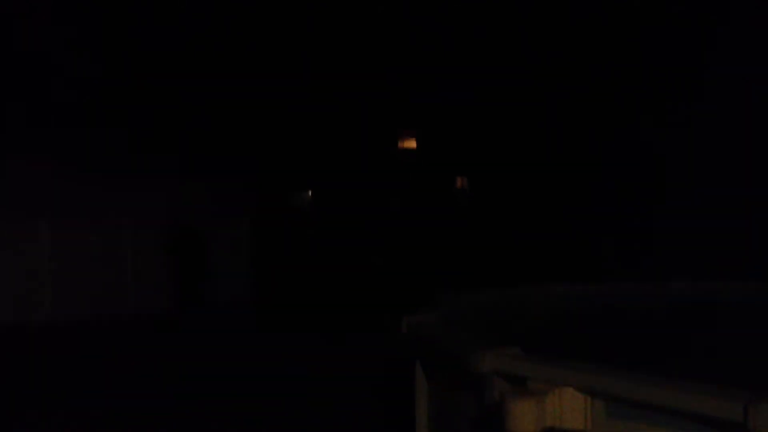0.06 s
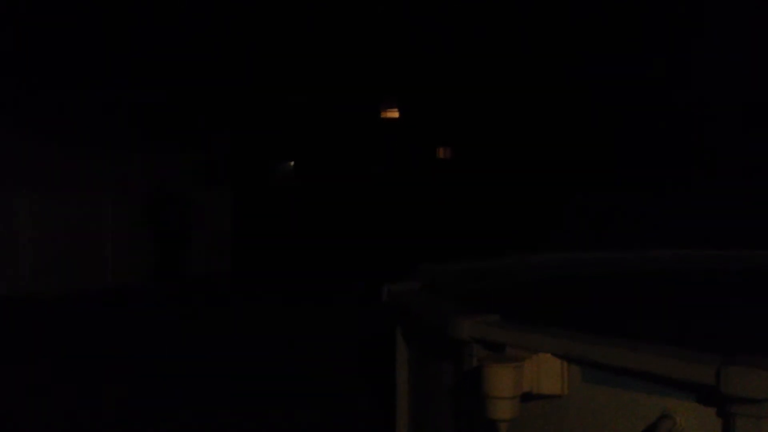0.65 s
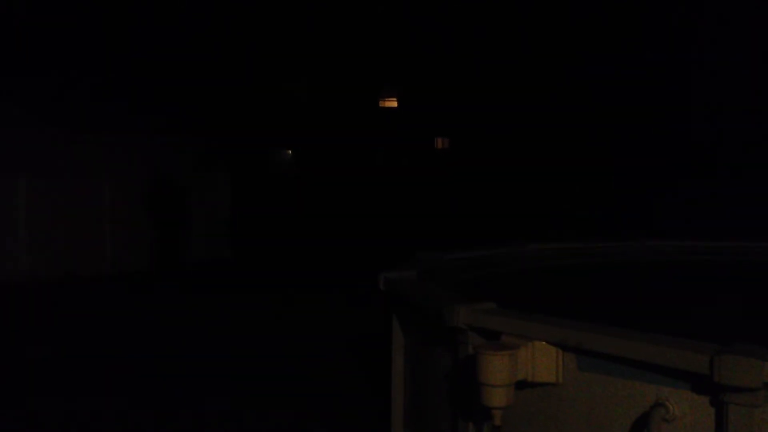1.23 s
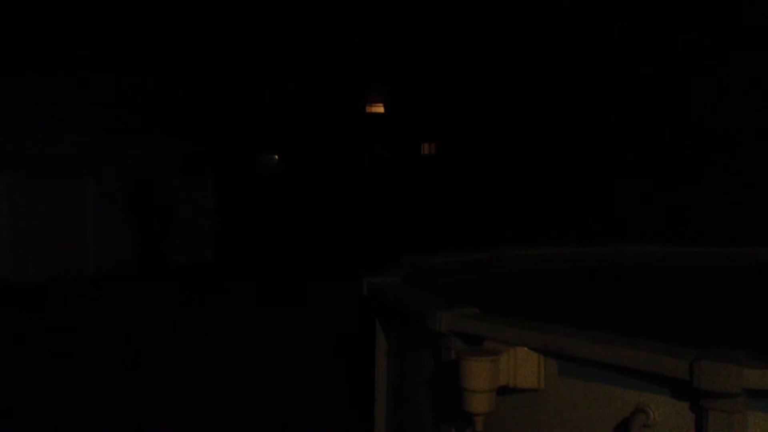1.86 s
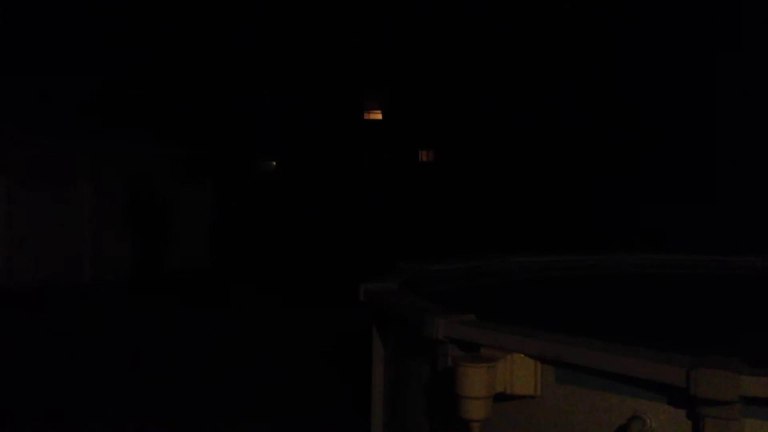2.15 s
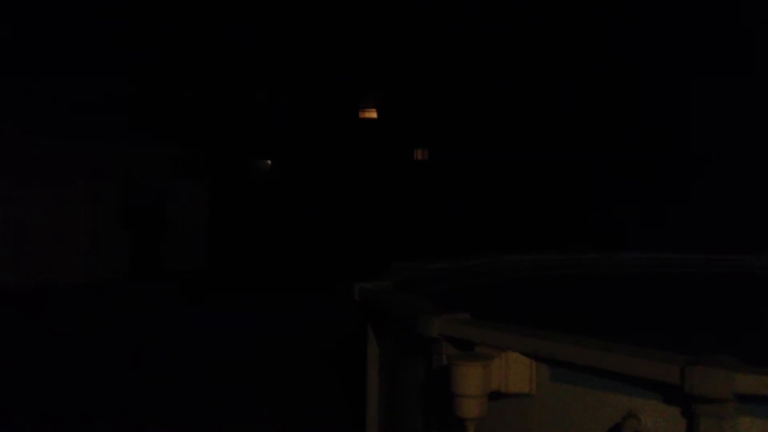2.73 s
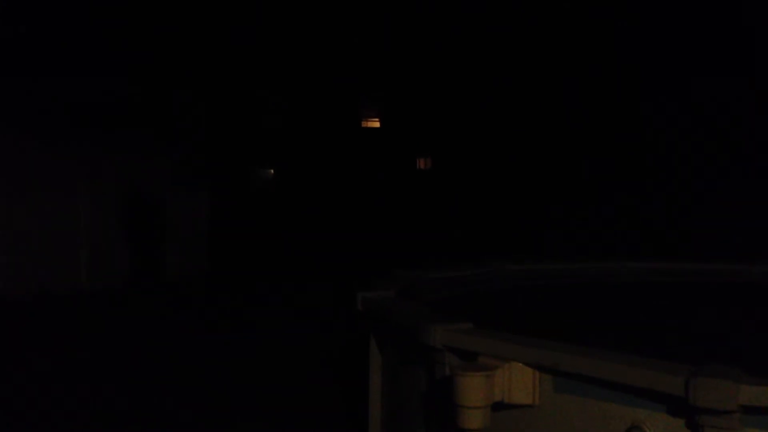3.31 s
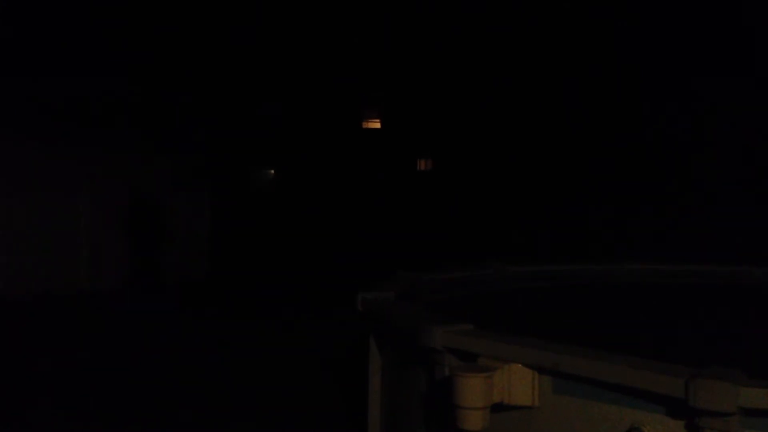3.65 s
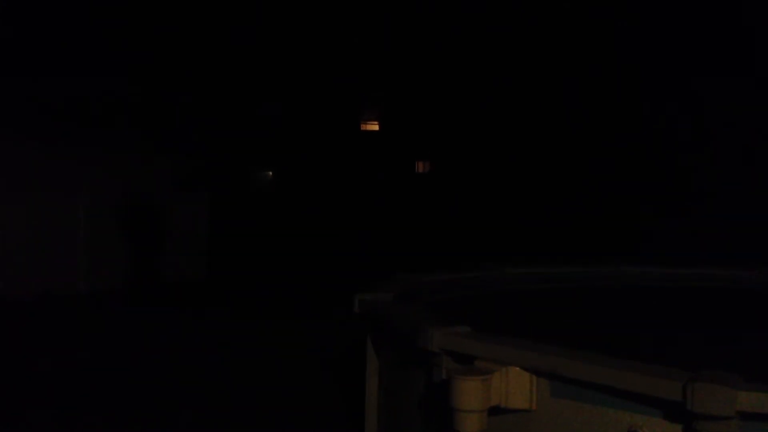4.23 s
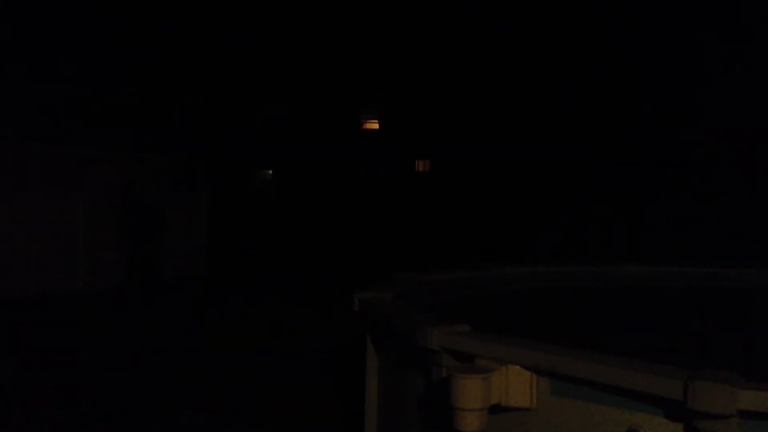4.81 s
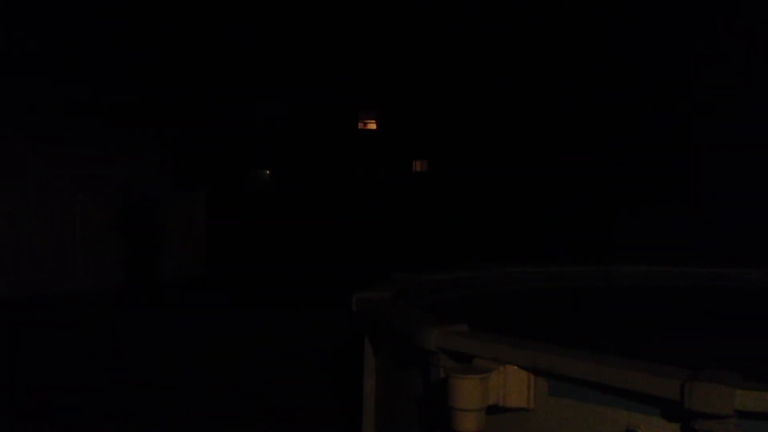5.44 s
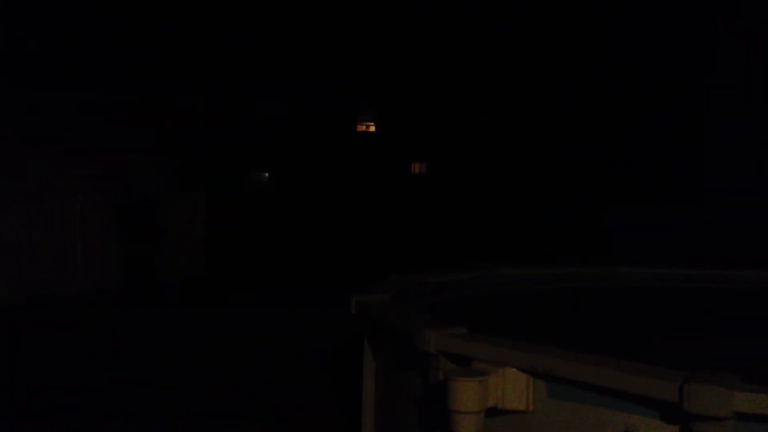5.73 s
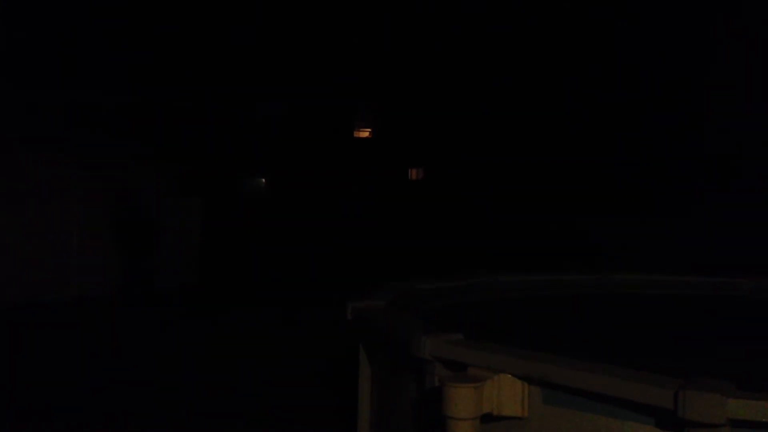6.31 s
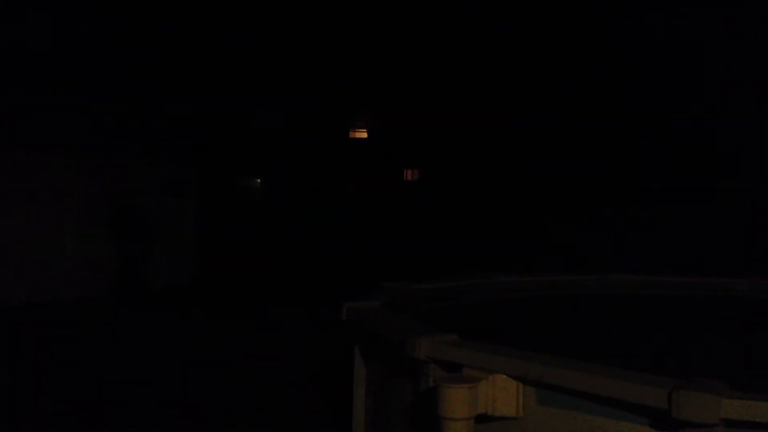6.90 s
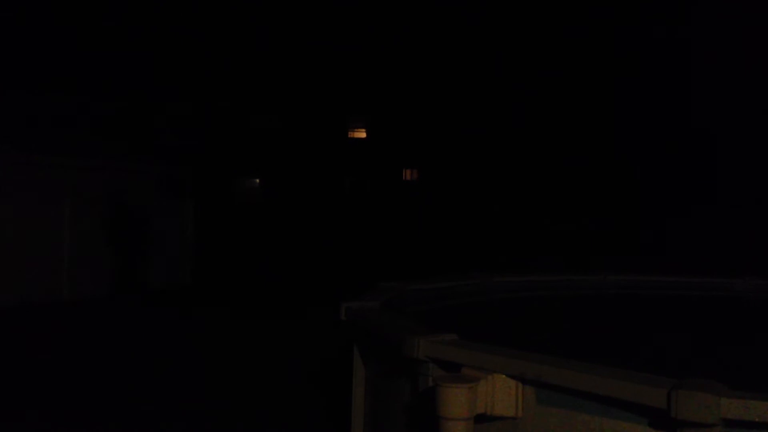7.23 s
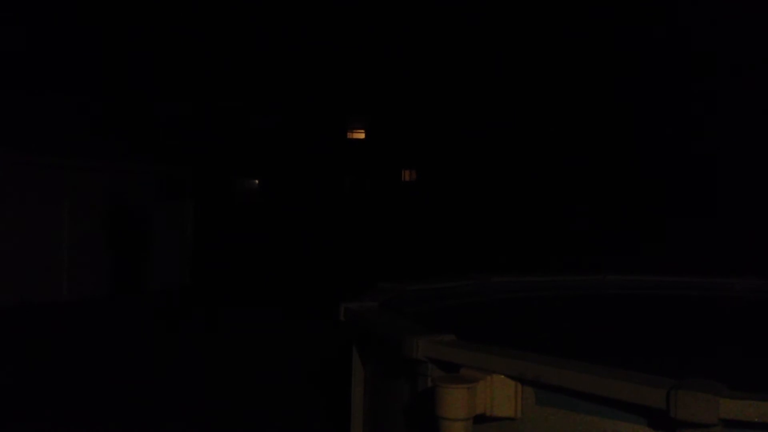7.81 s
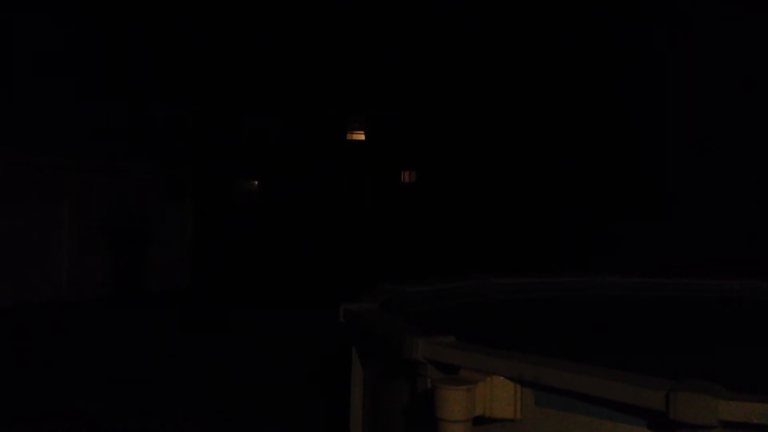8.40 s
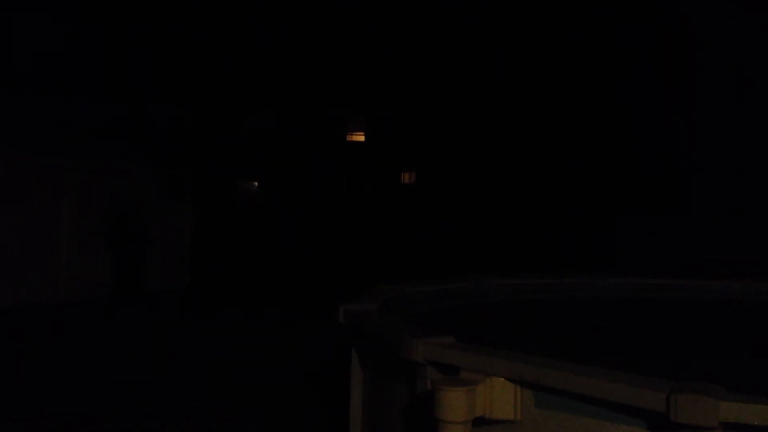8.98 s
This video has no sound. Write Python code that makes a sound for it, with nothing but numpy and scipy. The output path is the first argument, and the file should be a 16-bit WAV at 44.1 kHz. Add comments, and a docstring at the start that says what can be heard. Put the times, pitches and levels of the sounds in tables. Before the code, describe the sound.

Three treefrogs trade short, raspy, pulsing trills in a backyard at night, over a faint steady neighbourhood rumble and fine hiss. Each call leaves a brief echo. The nearest, loudest frog trills from about 0.5 to 1 second. A faint, faster one answers at 1.6 seconds, and a slightly higher frog at medium distance calls at 2.9. The near frog returns from 3.5 to 4.1 seconds, then overlaps with the higher one between 5.2 and 5.8. The faint frog calls again at 6.9 seconds, the higher one at 7.7, and the faint one once more at about 8.8. Far in the background, a car engine hums low and quietly from about 3 to 6 seconds. Its tyre noise swells softly to a peak around 7.4 seconds and then eases off, staying well below the closer frogs.

```python
"""A backyard at night, where three treefrogs trill in turn from the trees.
Each pulse of a trill is a short upward chirp of the larynx whose octave resonates in the vocal sac.
Hard surfaces return discrete echoes, and scattering in the yard adds a reverberant tail.
A distant car hums, then its tyres swell and fade, over the neighbourhood's rumble and a fine hiss."""
import sys
import numpy as np
from scipy import signal
from scipy.fft import rfft, irfft, next_fast_len
from scipy.io import wavfile
from scipy.ndimage import uniform_filter1d

SR = 44100
rng = np.random.default_rng(int(sys.argv[2]) if len(sys.argv) > 2 else 0)


def output_pcm(signal):
    """Save a mono or channel-first signal as 16-bit PCM at the path in sys.argv[1].

    Samples are clipped to [-1, 1] before scaling.
    """
    pcm = np.clip(np.atleast_2d(signal).T, -1, 1) * 32767
    wavfile.write(sys.argv[1], SR, np.round(pcm).astype(np.int16))


N = 403515

# throat resonances of the high and fast frogs (frequency [Hz], gain [dB])
SHARED_THROAT = [(2300, -23), (2750, -5), (3100, -3), (3500, 0.5), (3900, -18), (4600, -17), (5300, -31),
                 (6500, -20), (7100, -21), (7700, -14.5), (8500, -32)]
# their rasp spectrum (frequency [Hz], relative level [dB])
SHARED_RASP = [(300, -27), (1400, 1), (2600, -1), (3400, 5), (4000, -7), (5200, -11), (6600, -7),
               (7150, -8), (7700, -0.5), (8400, -16), (12000, -23)]


def undb(db):
    """Decibels to amplitude ratio."""
    return 10 ** (np.asarray(db) / 20)


def unit(x):
    """Normalisation to rms 1."""
    return x / np.sqrt(np.mean(x ** 2))


def curves(table, at):
    """Linear interpolation of each column against the first."""
    first, *columns = np.transpose(table)
    return [np.interp(at, first, c) for c in columns]


def colour(x, points):
    """Minimum-phase filter through points (frequency [Hz], gain [dB])."""
    size = next_fast_len(len(x) + 8192, True) // 2 * 2
    hz, db = np.transpose(points)
    bin_hz = np.arange(size // 2 + 1) * SR / size
    gain_db = np.interp(np.log(bin_hz + 1), np.log(hz), db)
    cepstrum = irfft(np.log(undb(gain_db)))
    cepstrum[1:size // 2] *= 2  # folding makes the response causal
    cepstrum[size // 2 + 1:] = 0
    return irfft(rfft(x, size) * np.exp(rfft(cepstrum)))[:len(x)]


def wander(rate):
    """Low-pass random modulation of rms 1."""
    hold = max(int(SR / rate), 1)
    steps = np.repeat(rng.standard_normal(N // hold + 1), hold)
    return unit(uniform_filter1d(uniform_filter1d(steps, hold), hold)[:N])


def night():
    """Stationary noise: town rumble and microphone hiss."""
    # noise floor (frequency [Hz], relative density [dB])
    spectrum = [(15, -67), (25, -36), (75, -23.5), (93, -10), (186, -1.5), (224, -10.5), (326, -4),
                (373, -11.5), (462, -10), (1120, -15.5), (1460, -17), (1910, -18), (2700, -20.5),
                (3180, -19), (15000, -24)]
    return unit(colour(rng.standard_normal(N), spectrum)) * undb(-64.5)


def car():
    """An exhaust tone at the firing rate drops out as the throttle closes; rolling noise peaks later."""
    # exhaust note (time [s], firing rate [Hz], level [dB])
    engine = [(2.7, 160.6, -76), (2.83, 161.0, -78), (2.95, 150.0, -68.5), (3.48, 151.3, -67),
              (3.91, 152.8, -61), (3.95, 153.4, -67.5), (4.32, 155.4, -65), (4.35, 156.3, -77),
              (4.45, 155.7, -62), (4.63, 155.3, -66.5), (5.2, 157.9, -59), (5.31, 158.5, -66.5),
              (5.88, 156.4, -60.5), (5.93, 152.8, -88)]
    # tyre swell (time [s], level [dB])
    tyre_levels = [(0, -73.5), (2.5, -68.5), (4, -65.5), (4.8, -63), (6.3, -59.5), (6.8, -58), (7.4, -55),
                   (8, -57.5), (8.6, -59.5), (9.15, -59)]
    # tyre spectrum (frequency [Hz], relative level [dB])
    tyre_colour = [(40, -33), (90, -13), (130, -3.5), (180, 5), (250, 2.5), (400, -6), (700, -6),
                   (1100, -3), (1700, -3.5), (2500, -7), (3500, -16.5), (5000, -24), (9000, -49)]
    t = np.arange(N) / SR
    hz, db = curves(engine, t)
    phase = 2 * np.pi * np.cumsum(hz * (1 + 0.0031 * wander(9.7))) / SR
    hum = np.sqrt(2) * np.sin(phase) * undb(db + 1.1 * wander(9))
    tyre_db, = curves(tyre_levels, t)
    tyres = unit(colour(rng.standard_normal(N), tyre_colour))
    return hum + tyres * undb(tyre_db + .5 * wander(6))


def yard(x, echoes, tail_db, t60, build_s):
    """Reverberation: direct sound, hard reflections and a decaying tail scattered by leaves and houses."""
    # filters of the reflections and of the diffuse tail (frequency [Hz], gain [dB])
    echo_colour = [(500, -13.5), (1100, -10), (1600, -11), (2000, -1), (2350, -5), (3100, -5), (7000, -7.5)]
    tail_colour = [(500, -6.5), (1050, -7.5), (1600, -9), (2150, 0.5), (2450, 2), (3100, -2.5),
                   (7000, -9.5)]
    t = np.arange(SR) / SR
    taps = np.zeros(SR)
    for ms, db in echoes:
        taps[int(ms * SR / 1000)] += undb(db)
    tail = rng.standard_normal(SR) * undb(-60 * t / t60) * (1 - np.exp(-t / build_s))
    tail *= undb(tail_db) / np.linalg.norm(tail)
    response = colour(taps, echo_colour) + colour(tail, tail_colour)
    return x + signal.fftconvolve(x, response)[:N]


def trills(table, per_s, slowing, warmup_s, soft_db, sac_soft_db, flat):
    """Pulse trains start soft and flat; the slack relaxes exponentially as the sac inflates."""
    scatter_db, scatter_pitch = 1.3, 0.012
    pulses = []
    for first, last, db, sac_db, hz in table:
        progress = np.linspace(0, 1, int(round((last - first) * per_s)) + 1)
        elapsed = (last - first) * (progress - slowing * progress * (1 - progress))
        slack = np.exp(-elapsed / warmup_s)
        chance = rng.standard_normal((len(progress), 3)).T
        pulses += zip(first + elapsed,
                      db + soft_db * slack + scatter_db * chance[0],
                      sac_db + sac_soft_db * slack + scatter_db * chance[1],
                      hz * (1 - flat * slack + scatter_pitch * chance[2]), slack)
    return pulses


def frog_voice(pulses, shape, throat, rasp_colour, overtone_db, rasp_db, jitter):
    """Source and filter: each push of the flanks sweeps the larynx upward; the sac favours the octave."""
    slack_db_per_ms = 0.3  # a weak push sounds only around its peak
    ms = np.arange(int(shape[0][0] * SR / 1000), int(shape[-1][0] * SR / 1000)) * 1000 / SR
    bend, fundamental_db, octave_db, edge_db = curves(shape, ms)
    waver = 1 + jitter * wander(900)
    tone, overtones, rasp_envelope = np.zeros((3, N))
    for onset, db, sac_db, hz, slack in pulses:
        at = int(onset * SR + ms[0] * SR / 1000) + np.arange(len(ms))
        inside = (at >= 0) & (at < N)
        at = at[inside]
        pitch = hz * (1 + bend[inside] / 100) * waver[at]
        phase = 2 * np.pi * np.cumsum(pitch) / SR + rng.uniform(0, 2 * np.pi)
        taper_db = -slack_db_per_ms * slack * np.abs(ms[inside])
        fundamental = undb(db + fundamental_db[inside] + taper_db)
        octave = undb(sac_db + octave_db[inside] + taper_db)
        tone[at] += fundamental * np.cos(phase) - octave * np.cos(2 * phase)
        # harder pushes give stronger overtones
        overtones[at] += np.sqrt(fundamental * octave) * sum(np.cos(k * phase) for k in range(3, 8))
        rasp_envelope[at] += undb((db + sac_db) / 2 + edge_db[inside] + taper_db)
    rasp = rasp_envelope * unit(colour(rng.standard_normal(N), rasp_colour))
    return tone + undb(overtone_db) * colour(overtones, throat) + undb(rasp_db) * rasp


def fast_frog():
    """A faint, rapid pulse train with a low direct-to-reverberant ratio."""
    # trills (start [s], end [s], fundamental [dB], octave [dB], pitch [Hz])
    calls = [(-0.25, 0.05, -71, -58, 1108), (1.599, 1.946, -54, -43.5, 1123),
             (6.893, 7.236, -55.5, -44, 1107), (8.829, 9.165, -55, -44, 1101)]
    # one pulse (time from peak [ms], bend [%], fundamental [dB], octave [dB], rasp [dB])
    shape = [(-13.5, -20, -25, -26, -27), (-7.5, -12.5, 0, -13, -4), (-2.5, 0.5, -3, -3, -7),
             (0, -0.5, -5.5, 0, 3), (3.5, 3, 7, -4, -2), (11.5, 9, -12, -39, -22)]
    # reflections (delay [ms], gain [dB])
    echoes = [(10, -13), (21, 1), (47, -7.5), (76, 0)]
    pulses = trills(calls, per_s=29.3, slowing=0, warmup_s=0.032, soft_db=-10, sac_soft_db=-13, flat=0.087)
    voice = frog_voice(pulses, shape, SHARED_THROAT, SHARED_RASP,
                       overtone_db=-20, rasp_db=-25.5, jitter=0.011)
    return undb(-0.5) * yard(voice, echoes, tail_db=0.9, t60=0.94, build_s=0.011)


def high_frog():
    """The larynx with the highest fundamental, roughened by pulsed noise."""
    # trills (start [s], end [s], fundamental [dB], octave [dB], pitch [Hz])
    calls = [(2.849, 3.308, -43.5, -42, 1151), (5.193, 5.598, -45, -42, 1156),
             (7.739, 8.142, -46, -43.5, 1146)]
    # one pulse (time from peak [ms], bend [%], fundamental [dB], octave [dB], rasp [dB])
    shape = [(-23.5, -23, -37, -39, -23), (-17.5, -11.5, -3.5, -13.5, -1), (-12, -10.5, -20, -2.5, 0),
             (-9, -4.5, -6.5, 5, -6), (-2.5, -2.5, -3, -10, -1), (1.5, 2, 0, -2.5, 4.5),
             (5, 3, -2, -3, -18), (7, 9, -39, -24, -24)]
    # reflections (delay [ms], gain [dB])
    echoes = [(17, -9.5), (36, -13), (52, -7.5), (104, -14)]
    pulses = trills(calls, per_s=19.6, slowing=0.035, warmup_s=0.04,
                    soft_db=-3, sac_soft_db=-21, flat=0.048)
    voice = frog_voice(pulses, shape, SHARED_THROAT, SHARED_RASP,
                       overtone_db=-14, rasp_db=-20.5, jitter=0.007)
    return undb(-0.85) * yard(voice, echoes, tail_db=-1.0, t60=1.0, build_s=0.014)


def near_frog():
    """The shortest path gives the loudest trills, with direct sound above the diffuse tail."""
    # trills (start [s], end [s], fundamental [dB], octave [dB], pitch [Hz])
    calls = [(0.457, 1.021, -34.5, -29, 1055), (3.535, 4.101, -36, -31, 1037),
             (5.272, 5.748, -35.5, -30.5, 1043)]
    # weak pulse after the first trill (time [s], fundamental [dB], octave [dB], pitch [Hz], slack [0-1])
    parting_pulse = (1.06, -42, -37.5, 1101.5, 0.5)
    # one pulse (time from peak [ms], bend [%], fundamental [dB], octave [dB], rasp [dB])
    shape = [(-21.5, -21.5, -36, -35, -16), (-17.5, -18, -24, -10, -3), (-10, -11.5, -6.5, -12.5, 0),
             (-5, -7, -8, -1, -0.5), (-1.5, -2, -1, 3.5, -2), (2.5, 3, 0, -3.5, -4.5),
             (3, 10.5, -0.5, -10, 1), (9.5, 11.5, -21.5, -31, -26)]
    # throat resonances and rasp spectrum (frequency [Hz], gain [dB])
    throat = [(2300, -23.5), (2700, -9), (3070, -1.5), (3400, -1.5), (3900, -27), (5200, -25), (6200, -30),
              (6700, -18), (7200, -21), (8500, -29)]
    rasp = [(300, -21), (1400, 4.5), (2600, -0.5), (3200, 6), (3900, -4.5), (5000, -7), (6200, -8),
            (6700, 2), (7150, -15), (7600, -11.5), (8500, -19), (12000, -23)]
    # reflections (delay [ms], gain [dB])
    echoes = [(13.2, -2), (21.3, -1), (31, -10.5), (58, -19.5), (105, -22)]
    pulses = trills(calls, per_s=21.1, slowing=0.041, warmup_s=0.072,
                    soft_db=-9, sac_soft_db=-27.5, flat=0.111)
    pulses.append(parting_pulse)
    voice = frog_voice(pulses, shape, throat, rasp, overtone_db=-15.5, rasp_db=-25.5, jitter=0.013)
    return undb(-0.27) * yard(voice, echoes, tail_db=-3.5, t60=0.88, build_s=0.0029)


def scene():
    """Superposition of the night air, the car and three frogs, in mono."""
    return (night() + car() + fast_frog() + high_frog() + near_frog())[None]


def record(dry):
    """Band limiting: an elliptic low-pass cuts the top treble steeply."""
    cutoff_hz = 15280
    return signal.sosfilt(signal.ellip(12, .1, 70, cutoff_hz, fs=SR, output="sos"), dry)


dry = scene()
out = record(dry)
output_pcm(out)
```